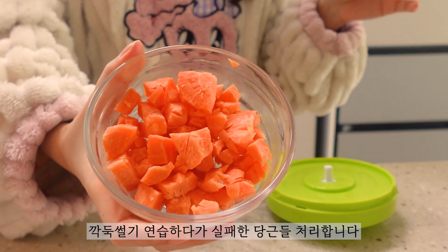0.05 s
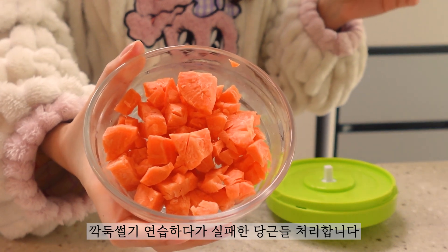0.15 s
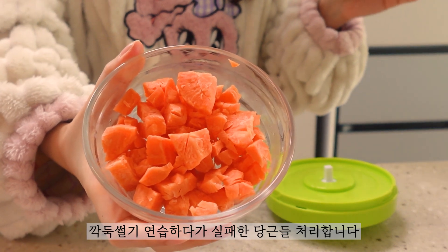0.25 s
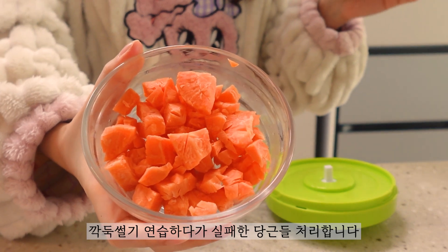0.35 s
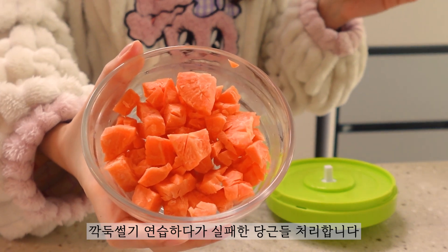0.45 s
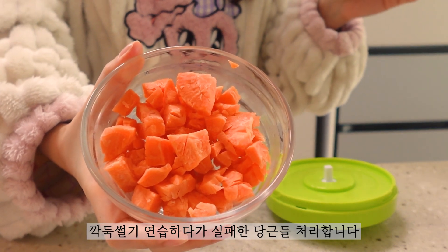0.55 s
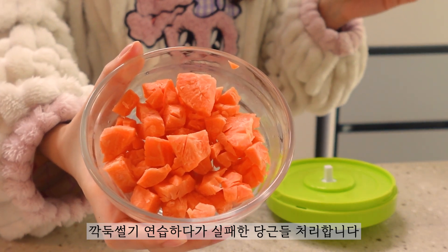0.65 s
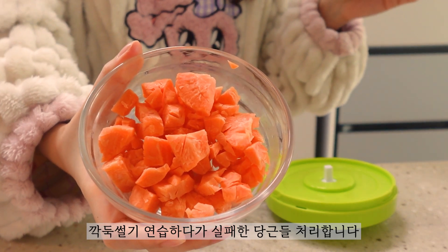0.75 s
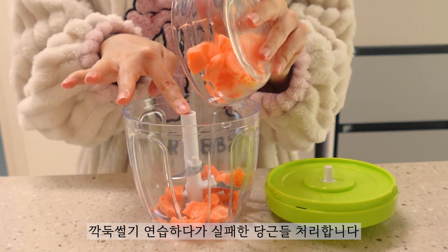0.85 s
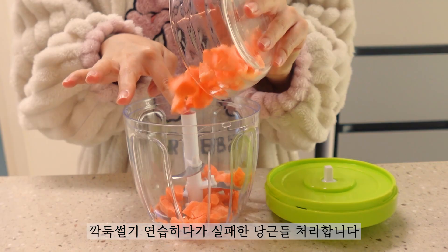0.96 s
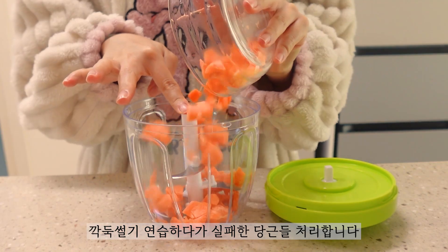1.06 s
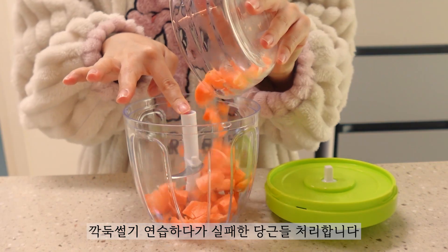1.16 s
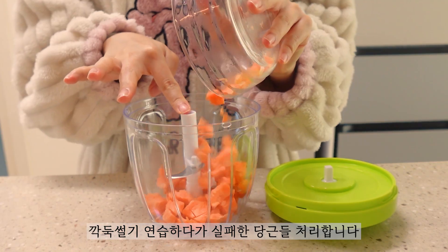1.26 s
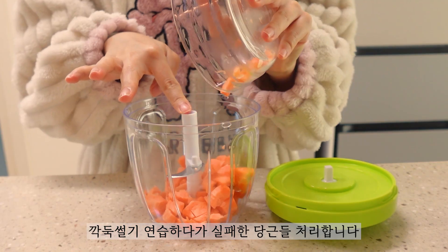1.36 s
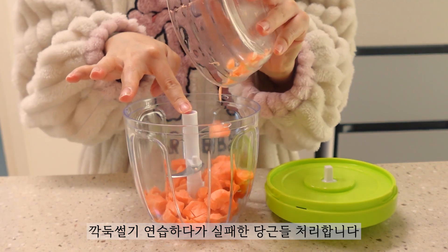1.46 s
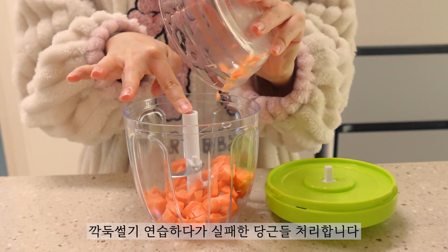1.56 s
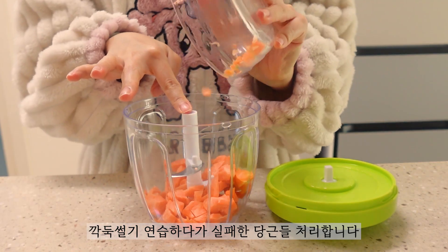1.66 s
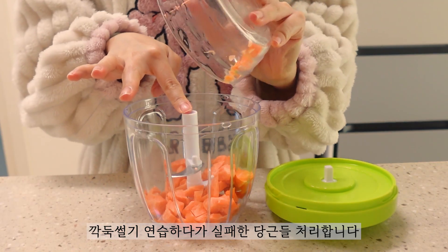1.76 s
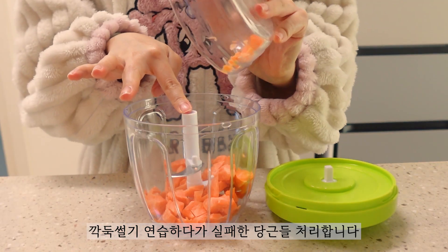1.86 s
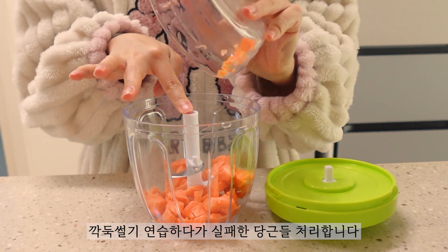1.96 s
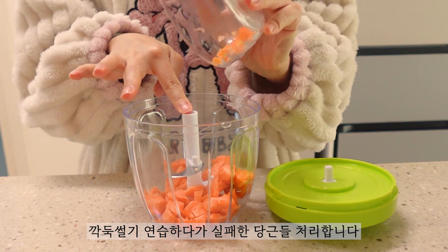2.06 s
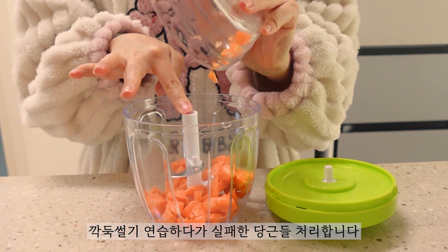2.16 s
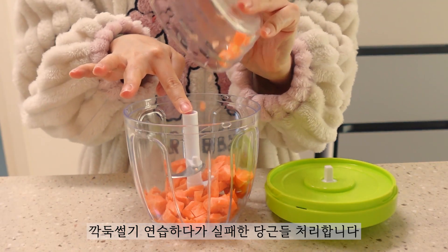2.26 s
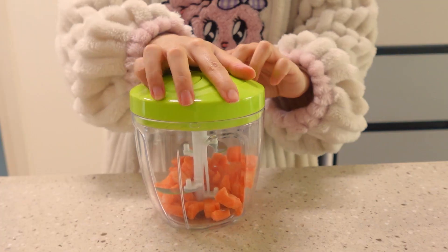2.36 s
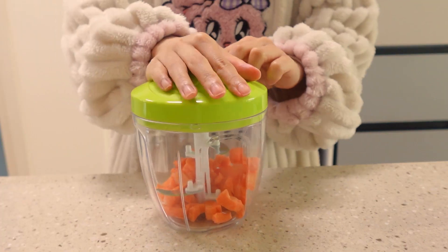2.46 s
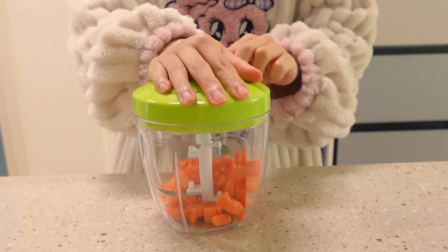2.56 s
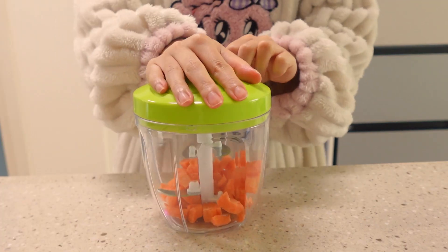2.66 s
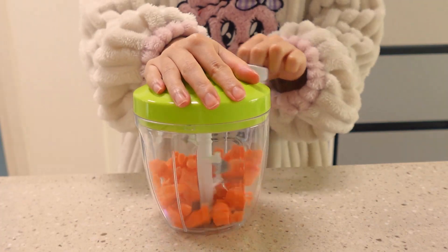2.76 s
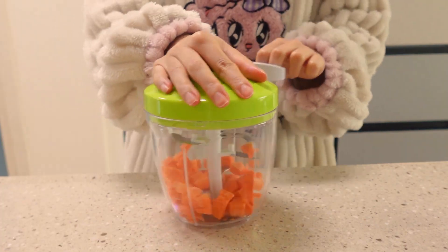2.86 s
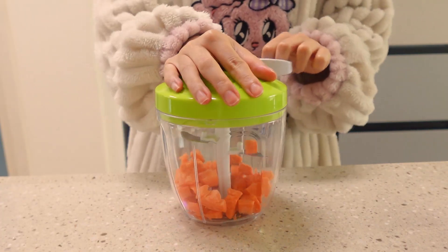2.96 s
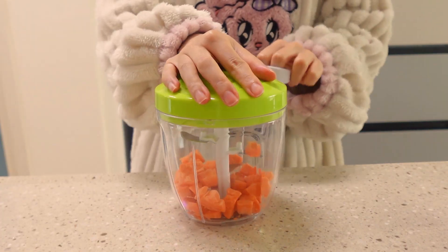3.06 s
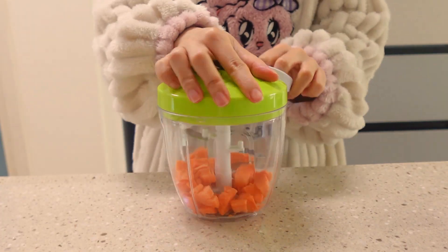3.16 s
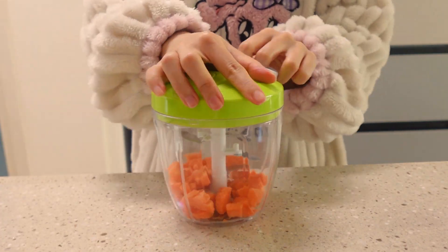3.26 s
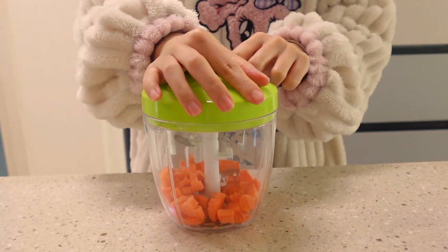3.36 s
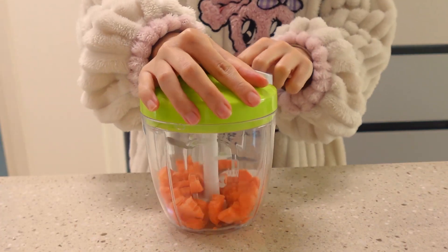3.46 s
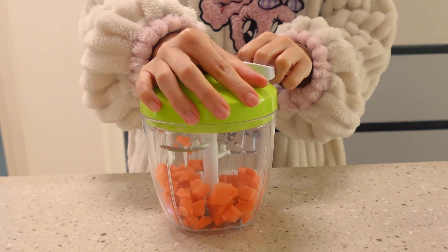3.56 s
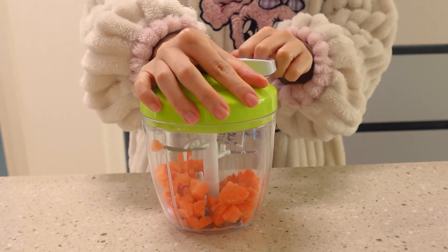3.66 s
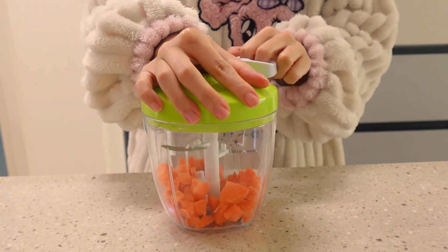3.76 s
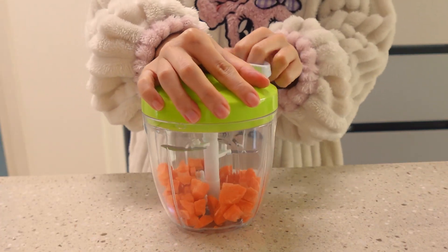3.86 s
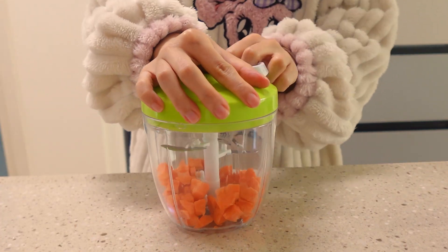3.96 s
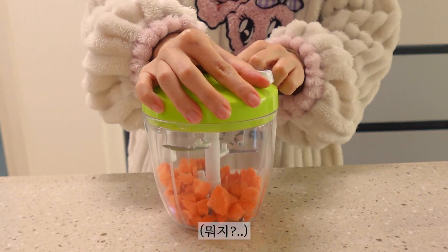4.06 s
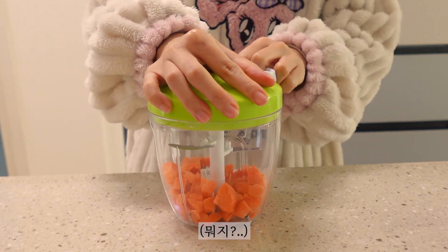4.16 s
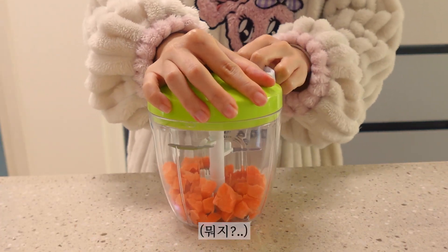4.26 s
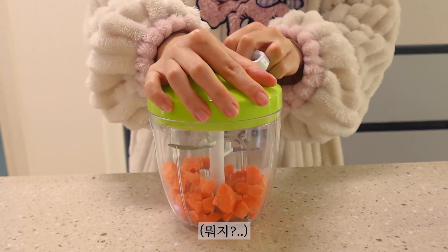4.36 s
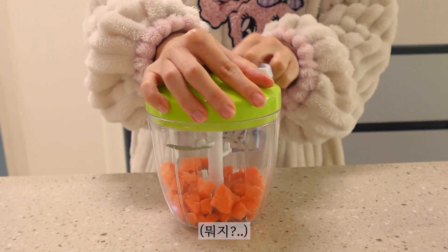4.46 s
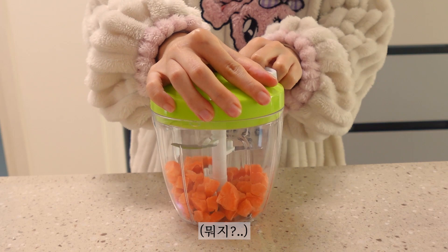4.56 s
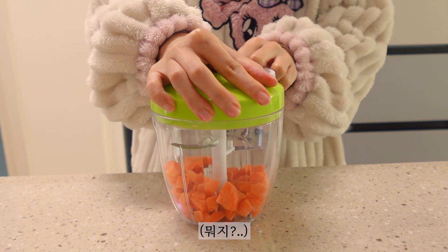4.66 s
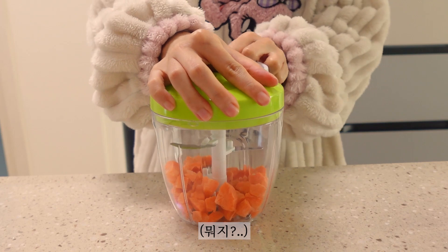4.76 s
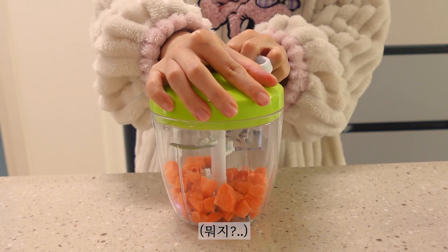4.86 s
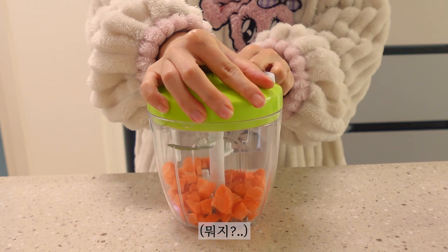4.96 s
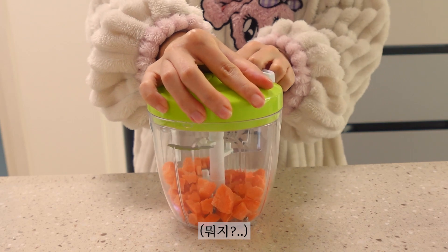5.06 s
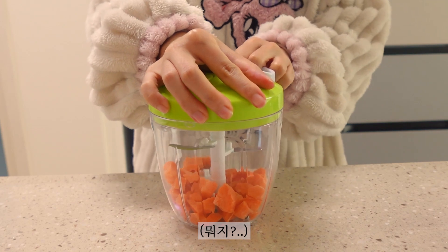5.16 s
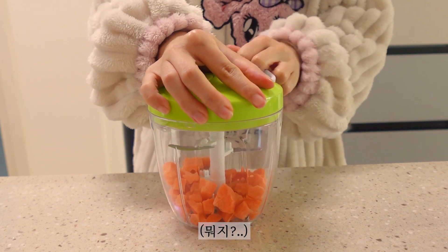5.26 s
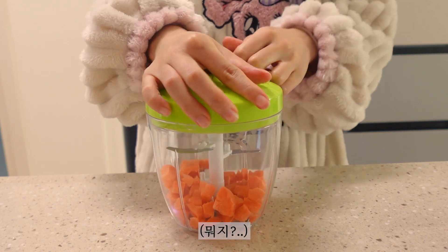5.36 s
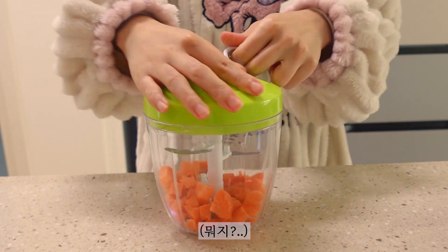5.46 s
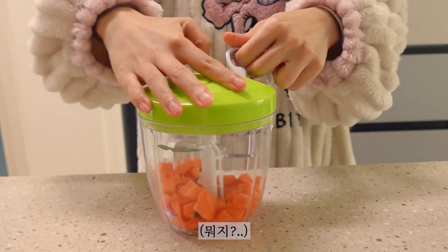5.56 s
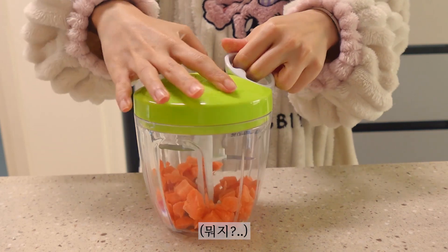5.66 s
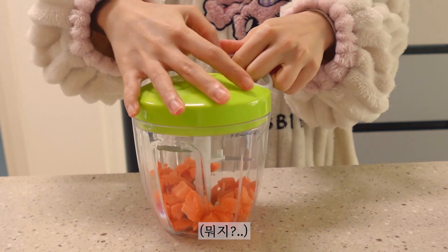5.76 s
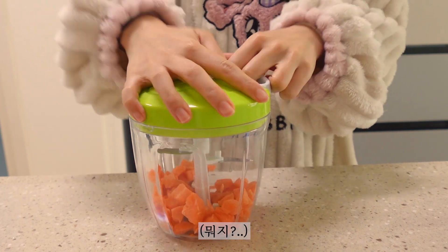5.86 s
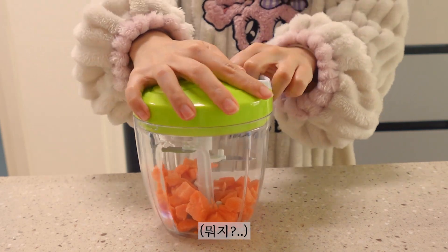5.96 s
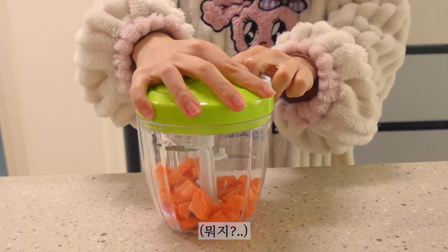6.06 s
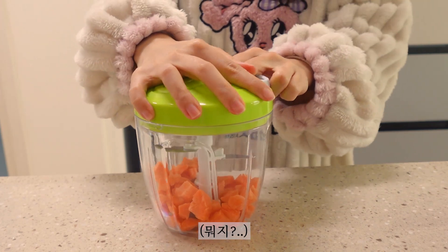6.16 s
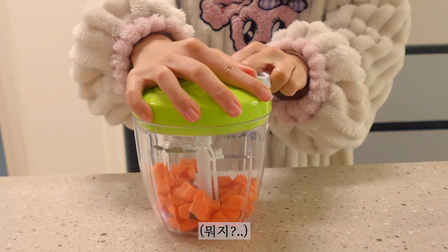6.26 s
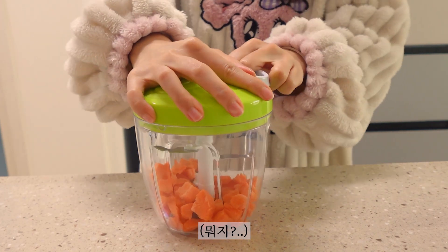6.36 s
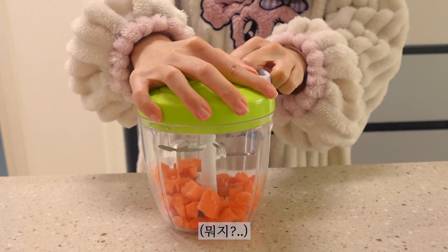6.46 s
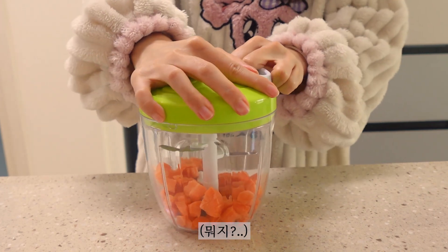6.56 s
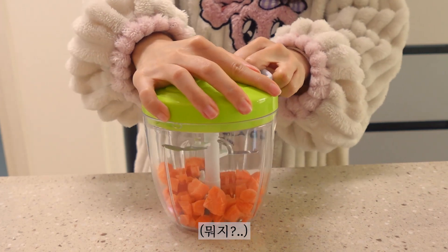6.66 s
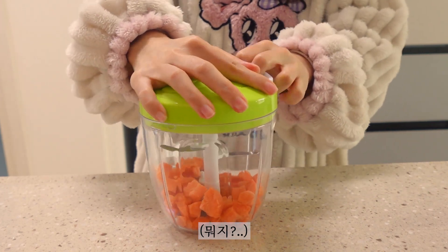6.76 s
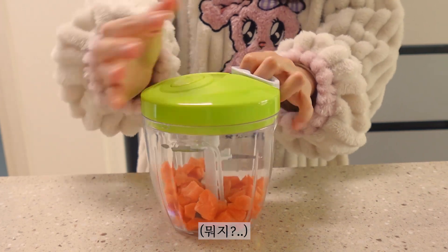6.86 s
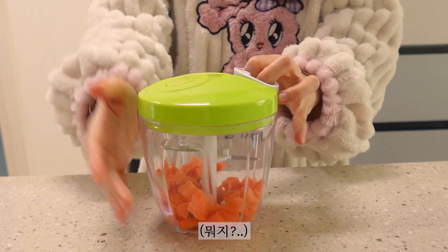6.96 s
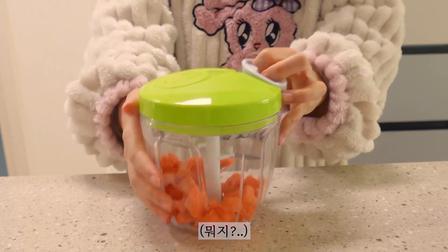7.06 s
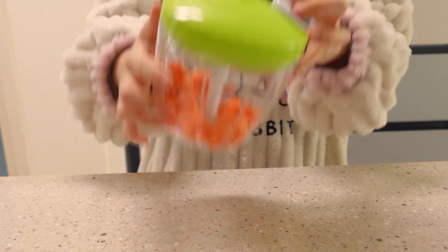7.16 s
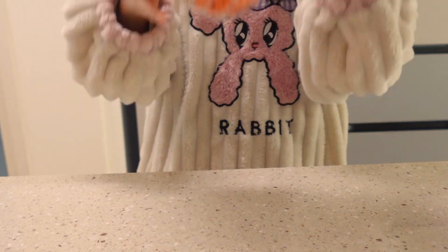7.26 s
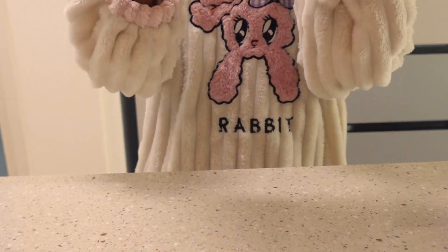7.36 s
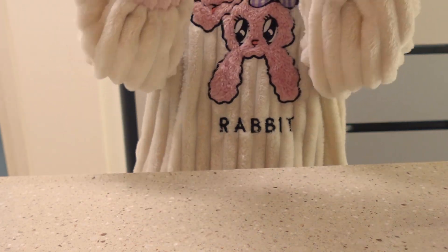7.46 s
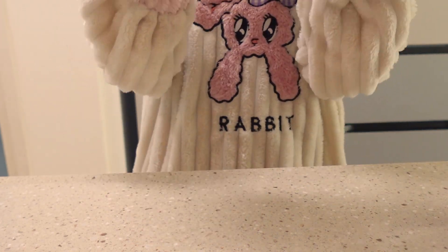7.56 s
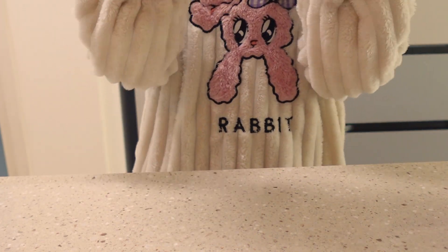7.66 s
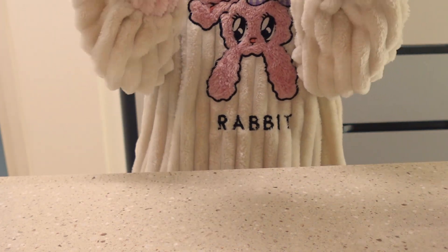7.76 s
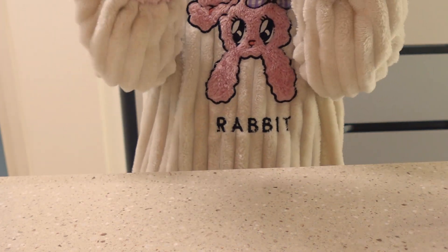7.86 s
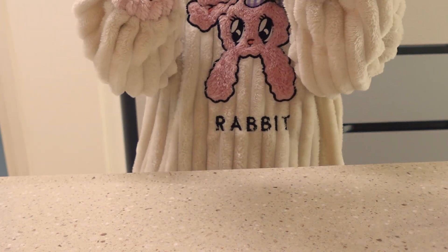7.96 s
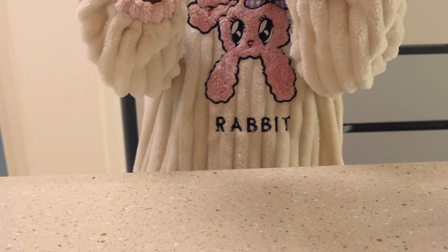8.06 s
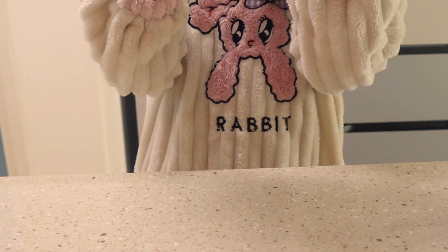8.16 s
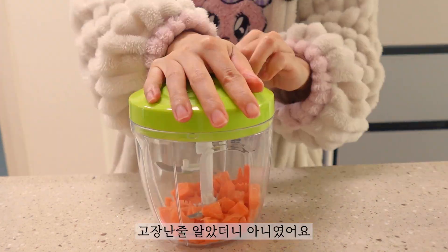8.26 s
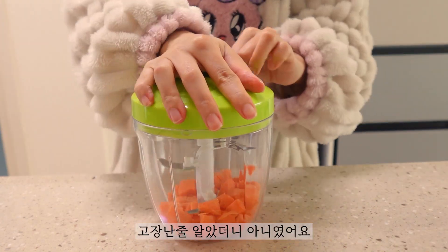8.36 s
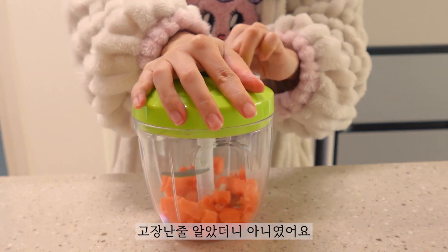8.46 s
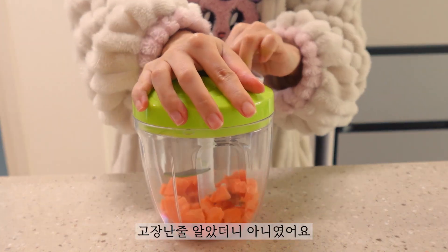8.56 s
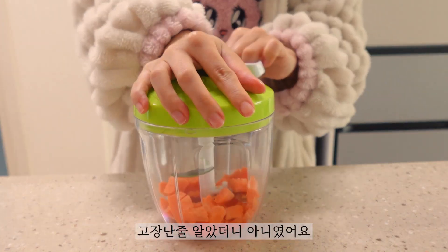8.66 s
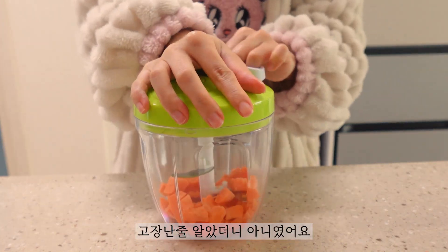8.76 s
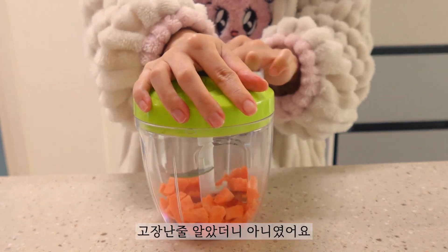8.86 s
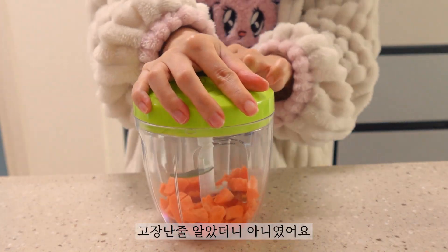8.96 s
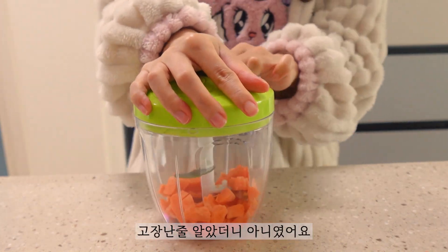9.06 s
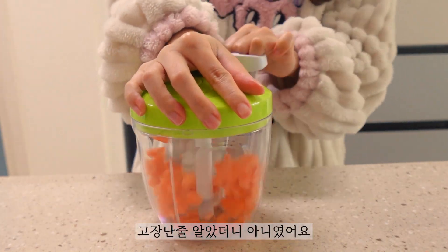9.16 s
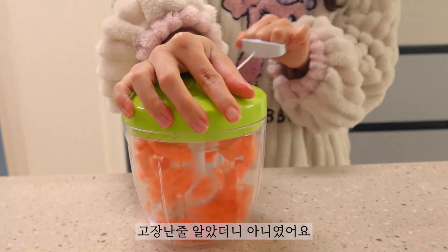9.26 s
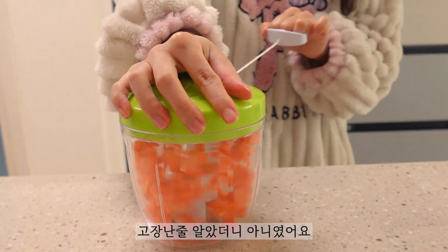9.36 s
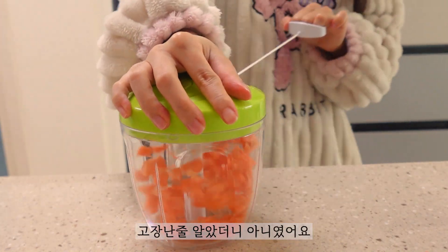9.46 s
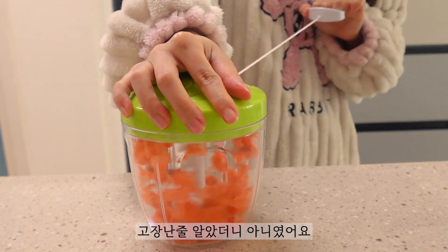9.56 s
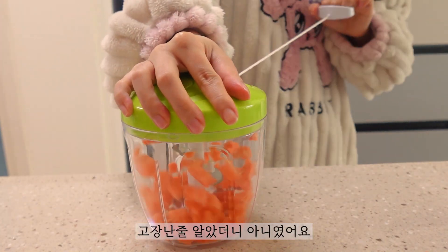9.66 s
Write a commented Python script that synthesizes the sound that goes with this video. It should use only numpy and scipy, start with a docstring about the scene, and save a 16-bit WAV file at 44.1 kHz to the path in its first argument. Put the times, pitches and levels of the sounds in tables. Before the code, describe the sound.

In a small hard kitchen, close to a phone microphone, carrot chunks pour into a ringing plastic cup. The lid goes on with clacks and tiny squeaks, then a jammed pull-cord chopper is tugged in uneven, dull knocks. The cup is shaken with rattling slaps, a few soft clicks follow, and a long pull whirs the blade through the pieces. Faint hiss lies underneath.

```python
"""A small hard kitchen, heard close by on a phone microphone, over a faint hiss of shaped noise.
Diced carrot is poured into the clear plastic cup of a pull-cord chopper; the lid goes on, the jammed blade is
tugged in short strokes, the cup is shaken, and at last a long pull spins the blade through the pieces.
Contacts are taps that ring modes of the cup and damped patches of its wall; noise through narrow resonances
makes short squeals of lid and blade. A decaying noise tail answers from the kitchen."""
import sys
import numpy as np
from scipy import signal
from scipy.fft import rfft, irfft
from scipy.io import wavfile

SR = 44100
rng = np.random.default_rng(int(sys.argv[2]) if len(sys.argv) > 2 else 0)


def waveform_to_disk(signal):
    """Save audio, clipped to [-1, 1], as 16-bit WAV at the path in sys.argv[1]."""
    frames = np.transpose(np.atleast_2d(signal))
    scaled = np.clip(frames, -1, 1) * 32767
    samples = np.round(scaled).astype(np.int16)
    wavfile.write(sys.argv[1], SR, samples)


def voltage_ratio(level):
    """Linear amplitude factor for a level in decibels (scalar or array-like)."""
    return 10 ** (np.asarray(level, float) / 20)


N = 427769  # length in samples
LID_ON_S, SPIN_S = 2.3, 9.15  # the lid goes on; the long pull spins the blade


def along(table, hz):
    """Read (Hz, dB) points on a log-frequency axis."""
    f, db = np.transpose(table)
    return np.interp(np.log(hz), np.log(f), db)


# Spectrum of the room tone. Each row: frequency in Hz, relative density in dB per Hz.
HISS_SPECTRUM = [(45, -32.5), (103, -10.5), (250, -7), (371, -7), (1000, -2.5), (1250, 4.5), (1600, -4),
                 (2600, -7), (3500, -4), (10300, -17), (16000, -10.5)]
HISS_DB = -54.5  # rms of the hiss before fading, ducking and microphone


def hiss():
    """Steady noise shaped to the room tone, alike on both sides in the bass and looser in the treble."""
    hz = np.arange(1, N // 2 + 2) * SR / N
    mid, side = rfft(rng.standard_normal((2, N))) * voltage_ratio(along(HISS_SPECTRUM, hz))
    loose = np.clip(hz / 6000, .15, .7)
    x = irfft(mid + loose * side * np.array([[1], [-1]]), N)
    return x * voltage_ratio(HISS_DB) / np.sqrt(np.mean(x ** 2))


def ducking(x, knee_db=-45, slope=0.037, release_s=0.33):
    """Gain of a suppressor that holds the room tone down after loud sound and lets it creep back."""
    keep = np.exp(-1 / (release_s * SR))
    loud = signal.lfilter([1 - keep], [1, -keep], x ** 2)
    return (1 + loud / voltage_ratio(2 * knee_db)) ** (-slope / 2)


# Spells in which the pieces tumble, scrape or are chopped. Each row: time of full level in seconds, hold in
# seconds, relative level in dB, ringing centre in Hz, treble in dB and bass passed to the counter in dB,
# both against the middle band.
STIRS = [(0.93, 0.13, -51.5, 2136, -9, -18), (1.14, 0.076, -17, 712, -17.5, -20),
         (1.28, 0.054, -18.5, 1273, -22.5, -18), (1.56, 0.34, -54.5, 2510, -9, -35.5),
         (2.45, 0.15, -49.5, 3500, -8, -43), (2.725, 0.12, -27, 2200, -13, -26.5),
         (2.85, 0.011, -20, 2320, -11.5, -15), (3.155, 0.18, -27.5, 1720, -14, -19.5),
         (3.45, 0.13, -26, 1500, -16.5, -19), (3.95, 0.031, -21.5, 1820, -13, -19.5),
         (4.09, 0.015, -25.5, 1700, -18, -23), (4.39, 0.035, -33, 3100, -16, -20),
         (4.85, 0.011, -40, 1500, -15, -16.5), (5.02, 0.0087, -24.5, 1710, -14, -21),
         (5.36, 0.25, -56.5, 2200, 0, -21), (5.6, 0.0065, -35, 3420, -9, -29.5),
         (6.0, 0.05, -48, 2500, -6.5, -17.5), (6.22, 0.12, -60, 2500, -13, -27.5),
         (6.33, 0.06, -41.5, 2900, -11.5, -17.5), (6.49, 0.024, -46.5, 2510, -10, -27),
         (6.66, 0.043, -55, 3020, -6, -23), (6.89, 0.05, -38, 1037, -12, -11),
         (7.045, 0.034, -29.5, 2200, -12.5, -25.5), (7.43, 0.4, -30, 1970, -17.5, -35.5),
         (8.305, 0.027, -42, 2180, -13, -22.5), (8.515, 0.012, -37.5, 2260, -17, -19),
         (8.668, 0.011, -48, 2000, -9, -16), (8.92, 0.12, -43.5, 1780, -15.5, -24.5),
         (9.19, .6, -26.5, 2400, -16, -23.5)]
# Faint creeping of pieces and fingers between the spells, one row with the same columns.
FIDGET = (3.5, 5, -60, 2000, -7, -37)
SWELL_DB_PER_S, SETTLE_DB_PER_S = 389.5, 172.5


def stirring(s):
    """Every spell swells, holds and settles by one law; powers add and weight the colour to the strongest."""
    start, held, db, *colour = np.r_[STIRS, [FIDGET]].T[:, :, None]
    swell_db = SWELL_DB_PER_S * (start - s).clip(0)
    settle_db = SETTLE_DB_PER_S * (s - start - held).clip(0)
    db = db - swell_db - settle_db
    power = voltage_ratio(2 * db.clip(-400))
    total = power.sum(axis=0)
    return np.sqrt(total), *((power * c).sum(axis=0) / total for c in colour)


FAINT_DB = -44  # stirring below this level is fine-grained


def tumble(per_s=1100, uneven=3.75, even=1.3, octaves=0.8, spin_octaves=0.31, throb_per_s=30, throb_db=2.5):
    """A dense shower of small contacts, mostly faint and now and then sharp."""
    chance = rng.random((int(per_s * N / SR), 3))
    s = N / SR * chance[:, 0]
    level, hz, treble_db, _ = stirring(s)
    spinning = s > SPIN_S

    # the blade bites unevenly over time, most of all in the treble
    bite = rng.standard_normal(int(throb_per_s * N / SR) + 2)
    bite_db = throb_db * spinning * np.interp(s * throb_per_s, np.arange(len(bite)), bite)

    # whirling blade and faint creeping have more even contact sizes; each kind is set to equal mean power
    fine = spinning | (level < voltage_ratio(FAINT_DB))
    mean_spread_db = np.where(fine, even, uneven)
    size = voltage_ratio(-mean_spread_db * np.log(1 - chance[:, 1]).clip(-5, 0))
    mean_square = np.where(fine, np.mean(size[fine] ** 2), np.mean(size[~fine] ** 2))
    size *= np.sqrt(SR / per_s / mean_square)

    hz = hz * 2 ** (np.where(spinning, spin_octaves, octaves) * (chance[:, 2] - .5))
    spot = np.arange(len(s))  # every contact has its own spot
    return s, size * level * voltage_ratio(bite_db / 2), hz, treble_db + bite_db, spot


# Carrot pieces landing in the open cup. Each row: start in seconds, relative blow energy in dB,
# ringing centre in Hz, treble in dB against the middle band.
LANDINGS = [(0.968, -15.5, 2380, -15), (1.033, -5.5, 648, -69), (1.034, -9, 1820, -54),
            (1.051, -6.5, 670, -48), (1.088, -10.5, 660, -41), (1.107, 3.5, 1190, -51),
            (1.12, 17, 2040, -24), (1.132, 10.5, 1910, -27), (1.146, 15, 2020, -24),
            (1.21, 14.5, 668, -20.5), (1.222, 11.5, 990, -35), (1.249, 18, 2950, -23.5),
            (1.297, 7.5, 4000, -13), (1.308, 15.5, 698, -23), (1.339, 9.5, 2210, -61),
            (1.374, 7.5, 2130, -13), (1.43, 3.5, 1150, -22), (1.449, 2, 4780, -14.5),
            (1.451, 0.5, 2380, -25), (1.477, 2, 2215, -45), (1.481, 0.5, 1027, -39.5),
            (1.531, 2, 1290, -23.5), (1.585, -7.5, 1970, -40), (1.638, -7.5, 1310, -46),
            (1.643, -10.5, 2700, -41), (1.663, -20, 3330, -38), (1.677, -20.5, 5400, -7),
            (1.793, -5.5, 3950, -13.5), (1.862, -10, 3400, -10.5), (1.989, -11.5, 2020, -29),
            (2.024, -16.5, 4510, -18)]
# Lid, cord handle and jammed blade clacking. Each row: the same columns.
CLACKS = [(2.379, -15.5, 3570, -7.5), (2.432, -5.5, 3480, -14.5), (2.703, 3, 1950, -10),
          (2.746, 4, 1240, -8), (2.819, 5.5, 2280, -10.5), (2.836, 8, 2130, -22), (2.863, 6.5, 1880, -17.5),
          (2.96, -5, 1310, -34), (3.086, -20.5, 2240, -50), (3.172, -11, 1390, -15),
          (3.217, 6.5, 2120, -36), (3.269, 2.5, 2780, -13.5), (3.286, 1.5, 2020, -31),
          (3.323, 11, 2250, -32), (3.432, 5, 2050, -10.5), (3.472, 10.5, 1560, -13), (3.554, 1, 2840, -1.5),
          (3.594, 4.5, 2150, -21), (3.618, -1, 1260, -37), (3.643, -7, 2070, -31), (3.707, -3, 1220, -26),
          (3.748, -6.5, 864, -47.5), (3.902, -4, 1960, -46), (3.969, 8, 927, -11.5),
          (4.073, 11, 2400, -11.5), (4.11, 3, 1360, -65), (4.372, -10, 2020, -31), (4.401, 3, 3120, -16),
          (4.536, 6, 1910, -4.5), (4.568, -2.5, 1400, -37), (4.837, -6.5, 1880, -16),
          (4.855, 0.5, 1080, -21), (4.976, 0.5, 1830, -50), (4.997, 7, 1830, -15), (5.037, 5.5, 2180, -6.5),
          (5.338, -2.5, 1120, -18), (5.357, 0, 2190, -34), (5.445, 1, 2260, -15), (5.583, -8, 3650, -13),
          (5.594, -1, 3800, -6.5), (5.614, -9, 2400, -11), (5.691, -11, 1590, -13), (5.708, -7, 2220, -12),
          (5.924, -3, 1230, -24), (5.946, -9.5, 1470, -43), (6.004, -8, 1450, -22), (6.321, 3, 3800, -5.5),
          (6.327, 0.5, 2050, -9.5), (6.338, -2, 1430, -19), (6.755, -19, 1300, -41), (6.845, -3, 2190, -19),
          (6.888, -10, 1950, -23), (6.908, 2, 2170, -20), (6.936, -2.5, 1300, -40), (6.944, -10, 2400, -32),
          (6.954, -1, 1100, -21.5), (7.038, 9, 2230, -14), (7.209, -9, 1800, -60), (8.249, -20.5, 4580, -7),
          (8.301, -13.5, 2470, -24), (8.339, -15.5, 3080, 1), (8.41, -15, 905, -65),
          (8.465, -22, 1500, -30), (8.762, -24.5, 2560, -15), (8.879, -13.5, 1990, -34),
          (8.896, -8, 1090, -23), (8.967, -12.5, 1270, -14), (8.976, -4, 870, -13.5),
          (9.072, -11, 900, -27), (9.081, -12, 2200, -19), (9.098, -3, 860, -8), (9.132, -3.5, 2170, -19)]
# The load slapping the wall while the cup is shaken in the air. Each row: the same columns.
SLAPS = [(7.359, -2.5, 970, -16), (7.385, 0.2, 1050, -18.5), (7.425, 2, 1480, -30), (7.492, 5, 1215, -17.5),
         (7.522, 6.5, 1280, -20), (7.54, 8.5, 2480, -19.5), (7.598, 1, 1290, -18.5),
         (7.66, -3, 2000, -24.5), (7.682, 7.5, 1820, -21.5), (7.715, 7.5, 2640, -18),
         (7.741, 3.5, 2370, -23), (7.797, 0.5, 1290, -35), (7.81, 6, 2020, -14.5), (7.855, 7.5, 3003, -14),
         (7.869, 2.5, 2793, -26), (7.887, 4.5, 1530, -32), (7.907, -1.5, 2580, -13),
         (7.979, 1.5, 1320, -24), (8.047, 0.5, 3030, -13.5), (8.078, -3.5, 1480, -19.5)]


def knocks(chatter_s=.002, chatter_db=-2.5, rebound_db=-2, count=6):
    """A knock is one blow and a few fading re-contacts on the same spot within milliseconds."""
    blows = np.array([*LANDINGS, *CLACKS, *SLAPS], float)
    s, db, hz, treble_db = np.repeat(blows, count, axis=0).T
    late = rng.exponential(1, (len(blows), count)).cumsum(axis=1)
    late = (late - late[:, :1]).ravel()  # in mean gaps after the first blow
    size = voltage_ratio(db + chatter_db * late + rebound_db * (late > 0))
    spot = np.arange(len(s)) // count
    return s + chatter_s * late, size, hz, treble_db, spot


def spots(contacts, spot_db=-5, lidded_db=-8, sharpness=14):
    """The struck spot itself gives a short decaying note at the ringing centre of each knock."""
    s, size, hz = contacts[:3]
    t = np.arange(SR // 20) / SR
    note = np.sin(2 * np.pi * hz[:, None] * t) * np.exp(-np.pi * hz[:, None] / sharpness * t)
    note = np.gradient(note * (1 - np.exp(-hz[:, None] * t)), axis=1)  # radiates as its rate of change
    level = size * voltage_ratio(np.where(s > LID_ON_S, lidded_db, spot_db))
    note *= (level / np.linalg.norm(note, axis=1))[:, None]
    at = (s * SR).astype(int)[:, None] + np.arange(len(t))
    return np.bincount(at.ravel(), note.ravel(), N + len(t))[:N]


def ring(x, hz, width_hz):
    """One resonance with a soft onset and steep skirts; a unit tap puts unit energy into it."""
    w = 2 * np.pi * hz / SR
    decay = np.exp(-np.pi * width_hz / SR)
    onset = np.exp(-np.pi * .3 * hz / SR)
    sos = [[1, 0, -1, 1, -2 * p * np.cos(w), p * p] for p in (decay, onset)]
    return signal.sosfilt(sos, x) / np.linalg.norm(signal.sosfilt(sos, signal.unit_impulse(SR // 4)))


# Broad, well damped response of the wall between its modes.
# Each row: frequency in Hz, relative response in dB per Hz.
WALL = [(95, -25.5), (270, -6.5), (450, -10), (700, -8.5), (2170, -0.5), (5000, -6.5), (8400, -16.5),
        (12500, -24.5), (16000, -27)]


def body(modes, modes_db):
    """The modes of the cup plus quarter-octave patches of damped wall: (Hz, width Hz, energy dB)."""
    hz = 95 * 2 ** (np.arange(30) / 4)
    patches = np.c_[hz, .15 * hz, along(WALL, hz) + 10 * np.log10(hz / 1000)]
    modes = np.array(modes, float)
    modes[:, 2] += modes_db + 10 * np.log10(modes[:, 1] / 100)
    return np.r_[patches, modes]


TREBLE_HZ, BASS_HZ = 5800, 400  # edges of the middle band
ROOM_FOCUS = 0.66  # share of a tap's local colour that reaches the walls
# lifted off the counter, the cup also loses some low middle: share of the bass loss under a usual level, below an edge
LIFT_SHARE, USUAL_BASS_DB, LOW_MID_HZ = 0.72, -29.5, 1080
# a softer contact also dulls the upper middle: share of the treble loss under a usual level, above an edge
SOFT_SHARE, USUAL_TREBLE_DB, HIGH_MID_HZ = 0.54, -18.5, 2400


def taps(s, size, centre_hz, treble_db, spot, modes, focus_db, scatter_db, spread_s=.0015):
    """Each tap strikes its own spot: it favours modes near its centre and shares out its energy by chance."""
    hz, width_hz, db = modes.T
    focus_db = focus_db * np.exp(-(np.log2(hz / centre_hz[:, None]) / 0.13) ** 2)
    bass_db = stirring(s)[-1]
    lift_db = LIFT_SHARE * (bass_db[:, None] - USUAL_BASS_DB) * np.log2(LOW_MID_HZ / hz).clip(0, 1)
    soft_db = SOFT_SHARE * (treble_db[:, None] - USUAL_TREBLE_DB) * np.log2(hz / HIGH_MID_HZ).clip(0, 1)

    # contacts on one spot share the same scatter; signs and delays are their own
    chance = rng.standard_normal((len(s), 3, len(hz)))
    local_db = focus_db + scatter_db * chance[np.searchsorted(spot, spot), 0]
    heard_and_sent = np.array([[[1]], [[ROOM_FOCUS]]])
    gain = voltage_ratio(db + lift_db + soft_db + local_db * heard_and_sent) * np.sign(chance[:, 1])

    # each band is set to its own energy, the middle band being the reference
    high, low = hz > TREBLE_HZ, hz < BASS_HZ
    for band, band_db in ((low, bass_db), (~low & ~high, 0 * s), (high, treble_db)):
        gain[..., band] *= voltage_ratio(band_db)[:, None] / np.linalg.norm(gain[..., band], axis=2, keepdims=True)

    # the bending wave reaches each patch of wall a moment apart, the treble most scattered
    delay_s = spread_s * np.sqrt(hz / 4000) * np.abs(chance[:, 2])
    at = ((s[:, None] + delay_s) * SR).astype(int).clip(0, N - 1)
    first, out = at.min(), np.zeros((2, N))
    for k in range(len(hz)):
        push = np.array([np.bincount(at[:, k] - first, size * g[:, k], N - first) for g in gain])
        out[:, first:] += ring(push + 1e-18, hz[k], width_hz[k])
    return out


KITCHEN_T60_S, KITCHEN_DB = 0.26, -4.5  # time to fall 60 dB; level of the tail for a unit tap


def kitchen(x, side_db=-3, turns_per_s=1.5):
    """A diffuse noise tail that turns steadily between two random patterns, so no fixed colour stands out."""
    t = np.arange(SR // 2) / SR
    turn = 2 * np.pi * turns_per_s * np.arange(N) / SR
    treble_band = signal.butter(1, [3500, 13000], "band", fs=SR)
    out = 0
    for share in (np.cos(turn), np.sin(turn)):
        common, own = rng.standard_normal((2, len(t)))
        # the sides differ most in this band
        own = (0.27 * own + signal.lfilter(*treble_band, own)) * voltage_ratio(side_db)
        tail = common + own * np.array([[1], [-1]])
        tail = tail * voltage_ratio(-60 * t / KITCHEN_T60_S) * np.clip(t / 0.0022, 0, 1)  # builds up over 2.2 ms
        tail *= voltage_ratio(KITCHEN_DB) / np.sqrt(np.mean(np.sum(tail ** 2, axis=1)))
        out = out + signal.fftconvolve(share * x[None], tail, axes=1)[:, :N]
    return out


# Narrow squeals: the lid squeaks on the rim, and at 4.55 s the blade rings faintly and high.
# Each row: start in seconds, length in seconds, relative drive level in dB, resonance in Hz.
SQUEALS = [(2.706, 0.025, -18.5, 2125), (2.744, 0.045, -33, 2190), (2.809, 0.033, -22.5, 2295),
           (4.547, 0.11, -51.5, 8550)]


def squeals(width_hz=130, fade_s=.012):
    """A short burst of noise drives one narrow resonance for each squeal of lid or blade."""
    t, out = np.arange(N) / SR, 0
    for start, length, db, hz in SQUEALS:
        rise = ((t - start) / 0.0018).clip(0, 1)
        shape = rise * np.exp(-(t - start - length).clip(0) / fade_s)
        out = out + ring(rng.standard_normal(N) * shape * voltage_ratio(db) + 1e-18, hz, width_hz)
    return out


# Wall and air modes of the open cup. Each row: frequency in Hz, width in Hz, relative level in dB.
OPEN_CUP = [(279, 14, 1.5), (640, 21, 0), (713, 27, -3.5), (1027, 5.6, 8), (1220, 88, -1), (2020, 130, -8),
            (2215, 30, -2), (2380, 32, -5), (2670, 43, -1.5), (2860, 28, 0), (3186, 22, 4), (3730, 190, -6),
            (4510, 91, -9.5)]
# Modes of the cup under lid and hand. Each row: the same columns.
LIDDED_CUP = [(590, 203, -9), (894, 490, -3), (1258, 330, 3), (2010, 530, -2.5), (2410, 265, -3),
              (3560, 1100, -6.5), (3550, 200, -8.5), (4660, 530, -9.5)]


def cup():
    """The open cup sings on clear modes; under lid and hand it is duller. Rows: heard close by, sent to the walls."""
    blows = knocks()
    open_body, lidded_body = body(OPEN_CUP, 6.7), body(LIDDED_CUP, 0.067)
    out = spots(blows) * np.array([[1], [ROOM_FOCUS]]) + squeals()
    # focus in dB without and with the lid, then scatter in dB
    for contacts, open_db, lidded_db, scatter_db in ((blows, 16, 9, 4), (tumble(), 8, 12, 5)):
        lidded = contacts[0] > LID_ON_S
        for modes, now, focus_db in ((open_body, ~lidded, open_db), (lidded_body, lidded, lidded_db)):
            out = out + taps(*(c[now] for c in contacts), modes, focus_db, scatter_db)
    return out


# From 8.2 s the room tone above the bass grows fainter, and after 8.8 s it rises again.
# Each row: time in seconds, gain in dB.
TONE_FADE = [(8.2, -1), (8.45, -10), (8.8, -19.5), (9.1, -3.5)]


def tone_fade():
    """Gain of the room tone above the bass, drawn straight in dB between the rows."""
    return voltage_ratio(np.interp(np.arange(N) / SR, *np.transpose(TONE_FADE)))


def scene():
    """The cup stands slightly right of centre; the suppressor leaves the low room tone alone."""
    (near, far), tone = cup(), hiss()
    low = signal.sosfilt(signal.butter(1, 500, fs=SR, output="sos"), tone)
    high = (tone - low) * ducking(near) * tone_fade()
    placed = near * voltage_ratio(np.array([[-.4], [.4]]))
    return placed + kitchen(far) + low + high


def low_pass(x):
    """Removes everything above the highest recorded frequency."""
    return signal.sosfilt(signal.butter(12, 16830, fs=SR, output="sos"), x)


def record(dry):
    """A phone microphone thins the bass below 130 Hz and rounds the highest peaks."""
    thin = signal.sosfilt(signal.butter(2, 130, "high", fs=SR, output="sos"), dry)
    mix = np.tanh(0.63 * thin) / 1.217
    return low_pass(mix)


dry = scene()
out = record(dry)
waveform_to_disk(out)
```